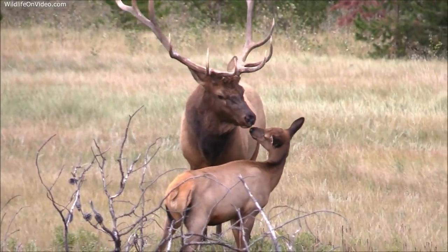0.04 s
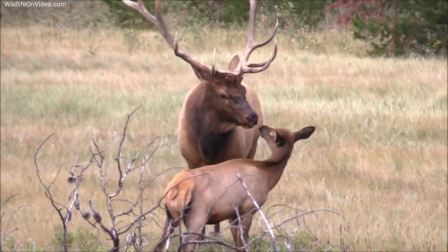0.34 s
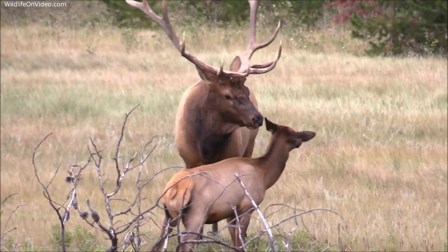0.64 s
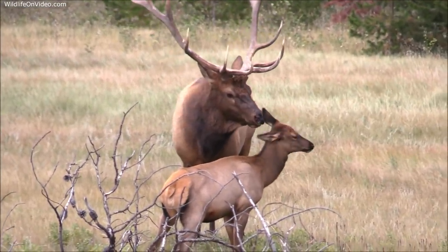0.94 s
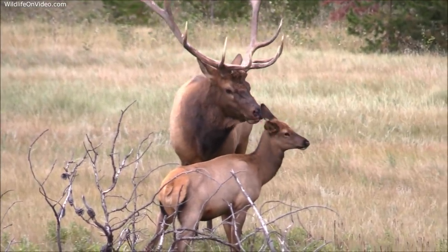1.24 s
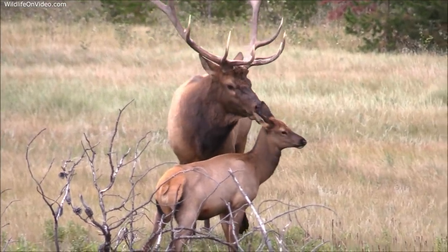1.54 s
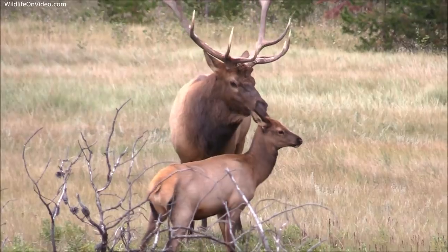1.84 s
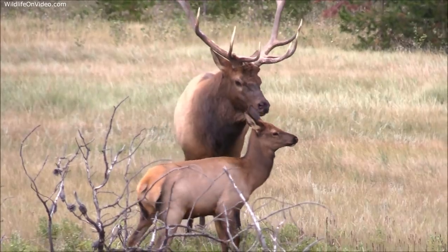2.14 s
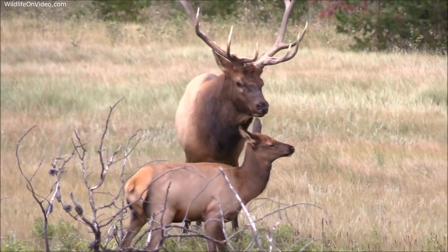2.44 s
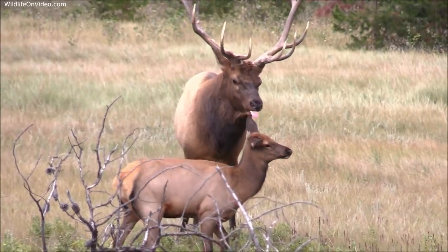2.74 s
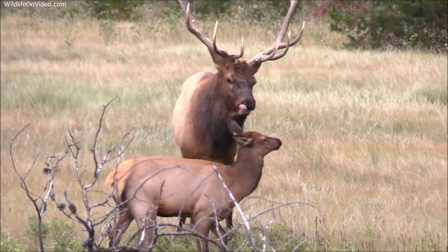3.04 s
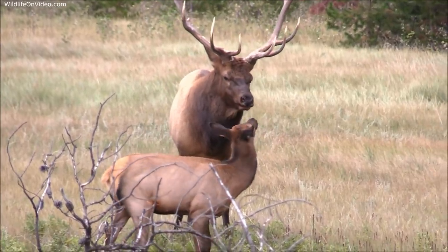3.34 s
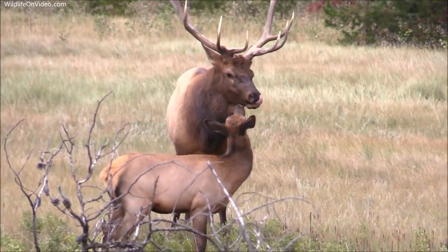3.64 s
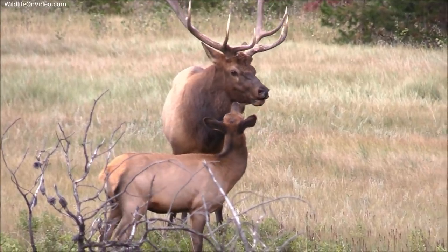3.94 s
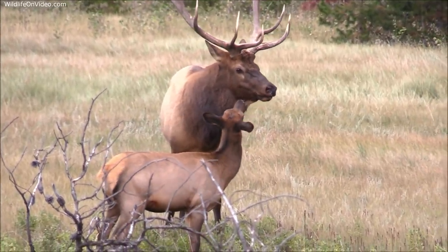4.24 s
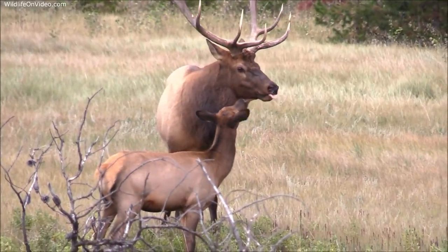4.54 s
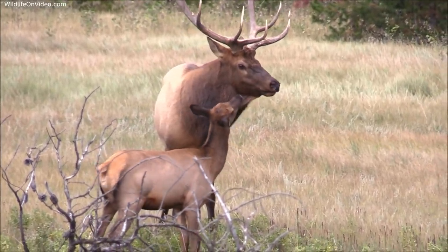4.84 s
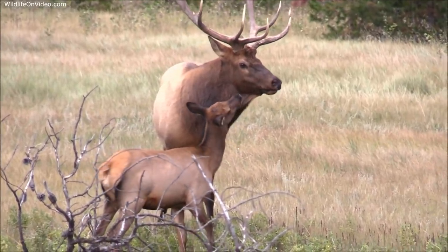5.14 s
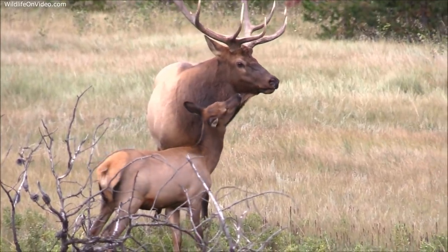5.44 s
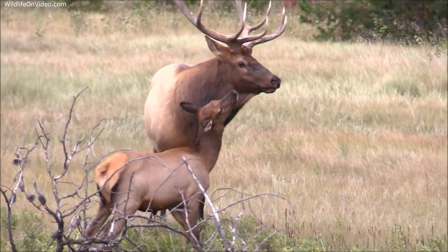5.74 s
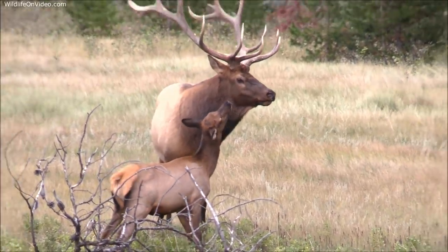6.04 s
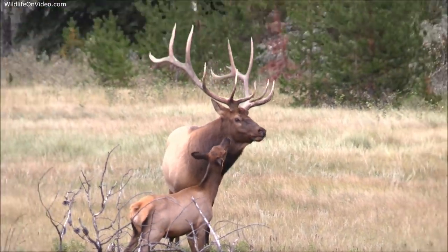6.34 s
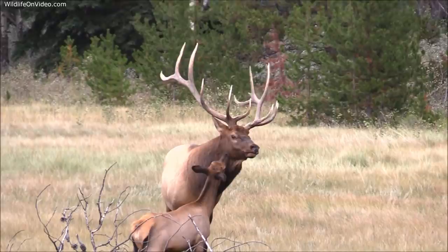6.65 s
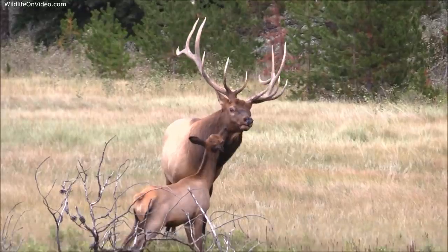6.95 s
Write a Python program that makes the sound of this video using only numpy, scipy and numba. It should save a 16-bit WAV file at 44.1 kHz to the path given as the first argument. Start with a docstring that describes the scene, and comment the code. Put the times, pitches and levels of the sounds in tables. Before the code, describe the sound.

A faint, distant bird chirps over an even hiss and the soft rush of a breeze in conifers. Wind then hits the microphone in a lumpy, low rumble, the loudest moment, and eases away. A closer songbird follows with brief gliding whistles that ring slightly across the meadow. Toward the end both birds twitter together as a few more wind bumps strike the microphone.

```python
"""A meadow at the forest edge, where two songbirds whistle short slurred phrases.
Each syrinx radiates a gliding, nearly pure tone, which the trunks scatter back as reverberation.
A breeze rushes softly in the conifers, and its turbulence now and then buffets the microphone,
over a steady hiss and a faint electronic whine. After the strongest gust the stereo image
narrows, then slowly opens again."""
import sys
import numpy as np
from scipy import signal
from scipy.fft import rfft, irfft, next_fast_len
from scipy.io import wavfile
from scipy.ndimage import uniform_filter1d
from numba import njit

SR = 44100
rng = np.random.default_rng(int(sys.argv[2]) if len(sys.argv) > 2 else 0)


def generate_wav(sig):
    """Save sig (samples, or channels by samples) to the path in sys.argv[1] as 16-bit PCM at SR."""
    pcm = np.round(np.clip(np.atleast_2d(sig).T, -1, 1) * 32767).astype(np.int16)
    wavfile.write(sys.argv[1], SR, pcm)


N = 309141
TIME = np.arange(N) / SR

# Levels and spectral densities are relative within each table; positive pan_db is to the left.
# Still air and hiss, the part common to both sides: frequency_hz, density_db
CALM_MID_SPECTRUM = [(20, -33), (40, -21), (70, -3.5), (100, -12), (160, -3.5), (350, -1), (600, -7),
                     (1300, -3.5), (2400, -9.5), (4000, -13), (7000, -15), (10500, -14), (14000, -15),
                     (16000, -19.5)]
# Still air and hiss, the part in which the sides differ: frequency_hz, density_db
CALM_SIDE_SPECTRUM = [(30, 12), (300, -16), (700, 8.5), (1400, 3.5), (2500, -4), (4500, -10.5),
                      (7000, -10.5), (9500, -25.5), (16000, -44)]
# Rush of the conifers: frequency_hz, density_db
BREEZE_SPECTRUM = [(50, -13), (120, -16), (200, -4), (320, 1), (600, -1), (1000, -7), (1600, -15),
                   (2600, -21), (5000, -51), (12000, -60)]
# Rise and fall of that rush: time_s, level_db
BREEZE_LEVELS = [(0.0, -53.5), (1.6, -50), (2.55, -49.5), (2.85, -57.5), (4.8, -59), (7.01, -54)]
# The wind's slow push on the microphone, with one long gust: time_s, level_db
GUST_LEVELS = [(0.0, -54), (0.8, -66), (1.2, -55.5), (1.8, -54.5), (2.14, -50), (2.2, -38), (2.6, -30.5),
               (2.85, -48), (3.0, -64), (4.2, -72), (4.7, -60), (6.4, -60), (6.65, -47), (7.01, -44)]
# Short puffs on top of that push: start_s, length_s, level_db
WIND_PUFFS = [(0.0, .07, -43), (.11, .09, -45), (1.39, .14, -45.5), (1.66, .09, -52), (1.92, .18, -47),
              (2.72, .07, -36), (2.93, .08, -45), (3.08, .11, -37.5), (3.27, .09, -50), (3.39, .12, -41),
              (3.67, .16, -45), (3.96, .05, -51), (5.16, .07, -55), (5.85, .06, -52), (5.99, .17, -36),
              (6.44, .06, -44), (6.56, .13, -40), (6.81, .14, -37)]
# Turbulent pressure at the microphone ports: frequency_hz, density_db
BUFFET_SPECTRUM = [(20, -25), (35, -11), (55, 1.5), (75, 4), (102, -2.5), (145, 5.5), (210, 0), (270, -3.5),
                   (350, -13), (450, -26), (700, -43), (3000, -90)]
# Moving low cut on the wind rumble, deep at first, thinner after the strongest gust: time_s, corner_hz
WIND_LOW_CUT = [(0, 90), (1.1, 26), (2.6, 34), (3.0, 125), (7.0, 80)]
# Notes that sweep or arch: bird, start_s, length_s, entry_hz, middle_hz, exit_hz, level_db, pan_db
SLURRED_NOTES = [ ("far", .025, .155, 1780, 2120, 1980, -52.5, 2),
                 ("far", .568, .068, 3300, 2560, 2080, -52, 4),
                 ("far", .708, .112, 3100, 3800, 5050, -58, 2),
                 ("far", 1.125, .102, 3800, 4030, 5200, -60, 1),
                 ("near", 3.24, .052, 3000, 3190, 3030, -40, -2),
                 ("near", 3.284, .04, 3080, 2860, 3230, -32, -3),
                 ("near", 3.32, .03, 3250, 3170, 3000, -39, -2),
                 ("near", 3.364, .087, 2160, 2150, 1950, -43, -2),
                 ("near", 4.006, .03, 2200, 2140, 2300, -51, -1),
                 ("near", 4.272, .074, 2320, 2140, 2020, -47, -2),
                 ("far", 4.708, .045, 3430, 3370, 3150, -47.5, -5),
                 ("near", 4.761, .026, 2550, 3100, 2650, -40, -8),
                 ("near", 5.273, .027, 2900, 3370, 3600, -45, -7),
                 ("near", 5.3, .022, 2620, 2550, 2510, -48.5, -9),
                 ("far", 5.336, .04, 4100, 4000, 2700, -58.5, -9),
                 ("far", 5.496, .032, 2955, 3280, 3000, -51.5, -8),
                 ("far", 6.098, .03, 2380, 2520, 2750, -51, 3),
                 ("far", 6.318, .064, 1870, 1790, 1710, -53, 2),
                 ("far", 6.384, .062, 3100, 4050, 2300, -52.5, 2),
                 ("far", 6.482, .044, 3600, 3370, 3130, -46.5, 0),
                 ("near", 6.514, .034, 3120, 3060, 2950, -41.5, 5),
                 ("near", 6.548, .042, 2600, 2490, 2410, -48, 6),
                 ("far", 6.55, .045, 2750, 4200, 3300, -48, -8),
                 ("far", 6.67, .05, 2380, 2900, 3380, -49.5, 4),
                 ("far", 6.712, .028, 3050, 3420, 3000, -48.5, 3),
                 ("far", 6.738, .028, 3000, 3440, 3050, -49, 3),
                 ("far", 6.768, .03, 3100, 3380, 3400, -54, 3),
                 ("far", 6.795, .125, 4000, 4750, 4150, -60.5, 0),
                 ("far", 6.903, .105, 4280, 3660, 3480, -53.5, 0),
                 ("near", 6.968, .05, 2790, 2570, 2420, -44, -6)]
# Notes that rest on a pitch: bird, start_s, length_s, entry_hz, held_hz, exit_hz, level_db, pan_db
HELD_NOTES = [ ("far", .22, .05, 1730, 1640, 1640, -49, 3), ("far", .312, .056, 2380, 2430, 2600, -54, 5),
              ("far", .355, .088, 2500, 2840, 2900, -52.5, 3),
              ("far", .433, .074, 2950, 3210, 2750, -46, 9), ("far", .918, .075, 3500, 3840, 3850, -60, 3),
              ("near", 2.625, .078, 2110, 2165, 2080, -50, -10),
              ("near", 2.699, .059, 2300, 2635, 2880, -41, -7),
              ("near", 2.756, .039, 2450, 2210, 2200, -44.5, 4),
              ("near", 2.83, .07, 2600, 2655, 2550, -42.5, -4),
              ("near", 2.896, .033, 2350, 2195, 2220, -45.5, 2),
              ("near", 3.475, .035, 2900, 2960, 2900, -42, -3),
              ("near", 3.502, .145, 2950, 2680, 2660, -42.5, 1),
              ("near", 4.028, .126, 2100, 2478, 2450, -44, -1),
              ("far", 4.18, .065, 1740, 1800, 1780, -55, 2),
              ("near", 4.655, .083, 2350, 2475, 1800, -46.5, -2),
              ("near", 4.785, .062, 2100, 2840, 2700, -38.5, -7),
              ("near", 4.856, .1, 2520, 2485, 1950, -47, -2),
              ("near", 6.122, .064, 2650, 2820, 2500, -43.5, 4),
              ("far", 6.285, .095, 2450, 2260, 2210, -55, 2)]
# Single eddies striking the microphone: start_s, level_db, ring_hz, pan_db
EDDY_STRIKES = [(0.032, -27, 184, 0), (2.19, -26, 150, -9), (2.244, -24.5, 150, -11),
                (2.346, -22.5, 138, -7), (2.398, -22, 272, -3), (2.461, -19, 290, 0),
                (2.476, -18, 201, -10), (2.548, -19, 253, -12), (2.61, -21, 191, -4),
                (2.635, -23.5, 162, 3), (2.752, -25, 191, 0), (2.813, -25.5, 212, 0),
                (3.094, -22.5, 205, 0), (3.115, -28, 218, 3), (3.429, -32, 158, 0), (6.067, -20, 212, -7),
                (6.585, -34, 168, -2), (6.851, -20.5, 313, -13), (6.907, -31, 223, -4)]
# Corner below which both sides sound alike: time_s, corner_hz
MONO_CORNER = [(0, 347), (1.8, 298), (2.25, 124), (2.58, 134), (2.76, 720), (3.2, 1250), (7.0, 255)]
# Low self-noise of the microphone capsules: frequency_hz, density_db
CAPSULE_SPECTRUM = [(20, -4), (70, 0), (200, -5), (500, 0), (1000, -5), (4000, -45)]


def from_db(db):
    """Amplitude ratio: a factor of ten for every 20 dB."""
    return 10 ** (np.asarray(db) / 20)


def rms_one(x):
    """Normalisation to unit mean power."""
    return x / np.sqrt(np.mean(x ** 2) + 1e-20)


def in_time(rows):
    """Linear interpolation of (time_s, value) rows at every sample."""
    return np.interp(TIME, *np.transpose(rows))


def hz_in_time(rows):
    """Logarithmic interpolation: frequency glides evenly in octaves."""
    time_s, hz = np.transpose(rows)
    return np.exp(np.interp(TIME, time_s, np.log(hz)))


def coloured(spectrum):
    """Spectral shaping: white noise is weighted by a spectrum, then brought to unit power."""
    hz, density_db = np.transpose(spectrum)
    size = next_fast_len(N)
    bins_hz = np.maximum(np.fft.rfftfreq(size, 1 / SR), 1)
    gain = from_db(np.interp(np.log(bins_hz), np.log(hz), density_db))
    return rms_one(irfft(gain * rfft(rng.standard_normal(size)))[:N])


def drift(bandwidth_hz):
    """Random modulation: low-passed noise of unit spread."""
    hop, settle = 40, 2000
    low_pass = signal.butter(2, bandwidth_hz, fs=SR / hop, output="sos")
    slow = signal.sosfilt(low_pass, rng.standard_normal(N // hop + settle + 2))[settle:]
    return np.interp(np.arange(N) / hop, np.arange(len(slow)), rms_one(slow))


def stereo(mid, side):
    """Sum and difference: left and right from their common and opposite parts."""
    return np.array([mid + side, mid - side])


def panned(x, pan_db):
    """Constant-power panning: the left gain exceeds the right by pan_db."""
    return rms_one(from_db([[pan_db / 2], [-pan_db / 2]])) * x


@njit
def moving_high_pass(x, corner_hz):
    """State-variable filter: two integrators form a high-pass whose corner can move."""
    out, low, band = np.zeros(len(x)), 0., 0.
    for i in range(len(x)):
        g = np.pi * corner_hz[i] / SR
        out[i] = (x[i] - (np.sqrt(2.) + g) * band - low) / (1 + g * (np.sqrt(2.) + g))
        low += 2 * g * (g * out[i] + band)
        band += 2 * g * out[i]
    return out


def calm_air(mid_db, side_db):
    """Stationary noise: the even murmur of open country under the microphone's hiss."""
    mid = from_db(mid_db) * coloured(CALM_MID_SPECTRUM)
    side = from_db(side_db) * coloured(CALM_SIDE_SPECTRUM)
    return stereo(mid, side)


def electronic_whine(pitch_hz, level_db):
    """Pure tone: a camera's electronics add one faint, steady sinusoid."""
    return np.sqrt(2) * from_db(level_db) * np.sin(2 * np.pi * pitch_hz * TIME)


def breeze(gain_db, side_db, restless_db, pan_db):
    """Aerodynamic noise: air flowing through the conifers gives a wide, soft rush."""
    rush = stereo(coloured(BREEZE_SPECTRUM), from_db(side_db) * coloured(BREEZE_SPECTRUM))
    level_db = in_time(BREEZE_LEVELS) + gain_db + restless_db * drift(6.8)
    return panned(rush * from_db(level_db), pan_db)


def wind_strength(rise_share=.38):
    """Incoherent addition: puffs that swell fast and fade slower add in power to the slow push."""
    power = from_db(in_time(GUST_LEVELS)) ** 2
    for start, length, level_db in WIND_PUFFS:
        puff = in_time([(start, 0), (start + rise_share * length, from_db(level_db)), (start + length, 0)])
        power += puff ** 2
    return np.sqrt(power)


def wind_on_microphone(gain_db, side_db, lumpy_db, pan_db):
    """Turbulence: pressure fluctuations at the ports make a lumpy rumble that follows the gust."""
    rumble = stereo(coloured(BUFFET_SPECTRUM), from_db(side_db) * coloured(BUFFET_SPECTRUM))
    local_power = uniform_filter1d(np.mean(rumble ** 2, axis=0), size=3000)
    rumble /= np.sqrt(local_power + 1e-9)   # leaves the slow swell to the wind's strength
    lumps = from_db(gain_db + lumpy_db * drift(41))
    return panned(rumble * wind_strength() * lumps, pan_db)


def slur_pitch(t, length, entry_hz, middle_hz, exit_hz, arch_power=1.6):
    """Continuous glide: one arc through three pitches, pointed at power 1 and round at 2."""
    position = 2 * t / length - 1
    slope = position * (exit_hz - entry_hz) / 2
    arch = np.abs(position) ** arch_power * ((entry_hz + exit_hz) / 2 - middle_hz)
    return middle_hz + slope + arch


def held_pitch(t, length, entry_hz, held_hz, exit_hz, scoop_s=.026, flick_s=.02):
    """Onset and offset transients: the pitch scoops into the note, holds, then flicks away."""
    scoop = np.maximum(1 - t / scoop_s, 0)
    flick = np.maximum(1 - (length - t) / flick_s, 0)
    return held_hz + (entry_hz - held_hz) * scoop ** 2 + (exit_hz - held_hz) * flick ** 2


def note_envelope(t, length, attack_share=.42, release_share=.27, longest_attack_s=.024):
    """Amplitude envelope: a note swells and fades along quarter sine waves."""
    attack_s = min(attack_share * length, longest_attack_s)
    ramp = np.minimum(t / attack_s, (length - t) / (release_share * length))
    return np.sin(np.pi / 2 * np.clip(ramp, 0, 1))


def bird(name, right_lag_ms, waver_share, flutter_db):
    """Frequency modulation: the syrinx's nearly pure tone slides through each note and trembles."""
    song = np.zeros((2, N))
    tremble = 1 + waver_share * drift(88)
    for notes, glide in ((SLURRED_NOTES, slur_pitch), (HELD_NOTES, held_pitch)):
        for singer, start, length, *pitches, level_db, pan_db in notes:
            if singer == name:
                span = slice(*np.searchsorted(TIME, [start, start + length]))
                t = TIME[span] - start
                pitch_hz = glide(t, length, *pitches) * tremble[span]
                tone = np.sqrt(2) * np.sin(2 * np.pi * np.cumsum(pitch_hz) / SR)
                song[:, span] += panned(from_db(level_db) * note_envelope(t, length) * tone, pan_db)
    left, right = song * from_db(flutter_db * drift(39))   # moving air makes a far tone flutter
    return np.array([left, np.interp(TIME - right_lag_ms / 1000, TIME, right)])


def forest_echo(song, t60_s, build_s, correlation, cutoff_hz):
    """Scattering and absorption: trunks return the song as a dying tail; the air absorbs its treble."""
    t = TIME[:int(1.5 * SR)]
    mid, side = rng.standard_normal((2, len(t)))
    scatter = stereo(np.sqrt(1 + correlation) * mid, np.sqrt(1 - correlation) * side)
    tail = scatter * from_db(-60 * t / t60_s) * (1 - np.exp(-t / build_s))
    tail /= np.sqrt(np.sum(tail ** 2) / 2)
    tail = signal.sosfilt(signal.butter(4, cutoff_hz, fs=SR, output="sos"), tail)
    return signal.fftconvolve(song, tail, axes=1)[:, :N]


def eddies(gain_db, rise_cycles, phase_spread_rad):
    """Damped oscillation: each eddy thumps the two ports out of step; higher ones ring shorter."""
    thumps = np.zeros((2, N))
    t = TIME[:SR // 8]
    for start, level_db, ring_hz, pan_db in EDDY_STRIKES:
        port_phases = phase_spread_rad * rng.standard_normal((2, 1))
        age = t * ring_hz / rise_cycles
        thump = age * np.exp(1 - age) * np.sin(2 * np.pi * ring_hz * t + port_phases)
        at = int(start * SR)
        thumps[:, at:at + len(t)] += panned(from_db(level_db + gain_db) * thump, pan_db)[:, :N - at]
    return signal.sosfilt(signal.butter(2, [55, 750], "band", fs=SR, output="sos"), thumps)


def scene():
    """Superposition: steady background, wind, birdsong and its reverberation add linearly."""
    calm = calm_air(mid_db=-51.5, side_db=-52.5)
    whine = electronic_whine(pitch_hz=13844, level_db=-83.0)
    rush = breeze(gain_db=0.5, side_db=-3.0, restless_db=1.0, pan_db=-2.5)
    rumble = wind_on_microphone(gain_db=0.5, side_db=-3.0, lumpy_db=2.0, pan_db=-5.5)
    near = bird("near", right_lag_ms=-0.1, waver_share=0.005, flutter_db=1.0)
    far = bird("far", right_lag_ms=0.039, waver_share=0.009, flutter_db=3.0)
    birds = from_db(0.2) * near + from_db(-4.2) * far
    # scatter from the grass and ground blurs each note, the deep forest sustains it
    blur = forest_echo(from_db(-12.5) * near + from_db(-7.0) * far,
                       t60_s=0.16, build_s=0.0037, correlation=0.51, cutoff_hz=4870)
    echo = forest_echo(from_db(-8.0) * near + from_db(-9.0) * far,
                       t60_s=1.5, build_s=0.034, correlation=0.27, cutoff_hz=3400)
    thumps = eddies(gain_db=-1.0, rise_cycles=0.64, phase_spread_rad=0.72)
    buffeting = np.array([moving_high_pass(port, hz_in_time(WIND_LOW_CUT)) for port in rumble + thumps])
    return calm + whine + rush + buffeting + birds + blur + echo


def record(dry):
    """Mid-side filtering: the bass is centred, the capsules add their murmur and the top is cut."""
    left, right = dry
    mid, side = (left + right) / 2, (left - right) / 2
    corner_hz = hz_in_time(MONO_CORNER)
    side = moving_high_pass(side, corner_hz)
    # a second, time-reversed pass cancels the phase shift of the first
    side = moving_high_pass(side[::-1].copy(), corner_hz[::-1].copy())[::-1]
    murmur = from_db(-72.0) * coloured(CAPSULE_SPECTRUM)
    top_cut = signal.ellip(12, .1, 80, 15900, fs=SR, output="sos")
    return signal.sosfilt(top_cut, stereo(mid, side + murmur))


dry = scene()
out = record(dry)
generate_wav(out)
```